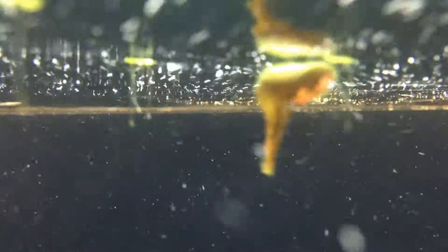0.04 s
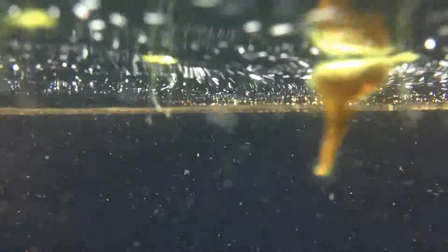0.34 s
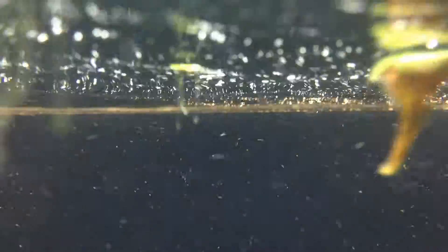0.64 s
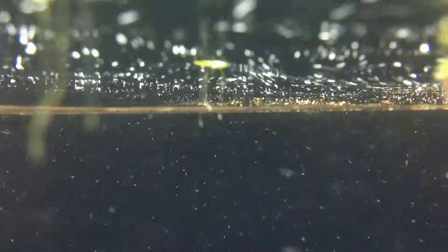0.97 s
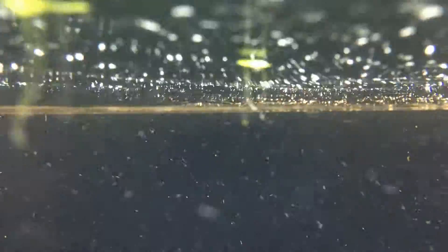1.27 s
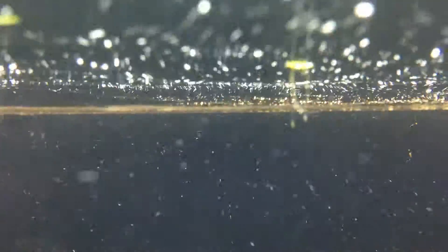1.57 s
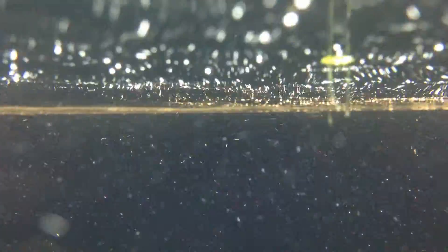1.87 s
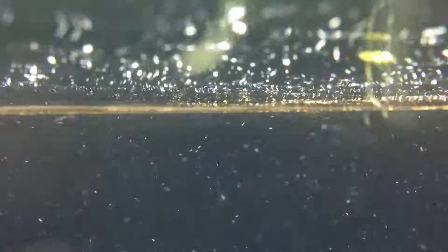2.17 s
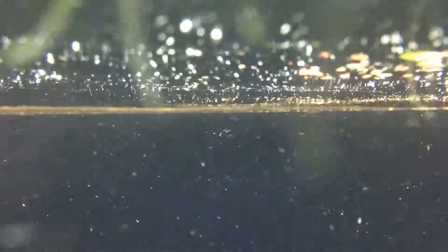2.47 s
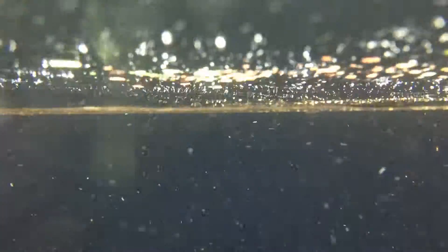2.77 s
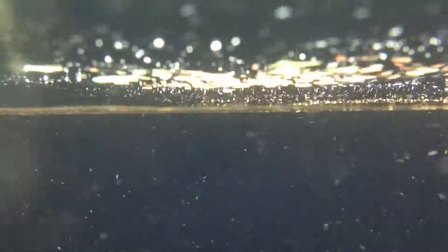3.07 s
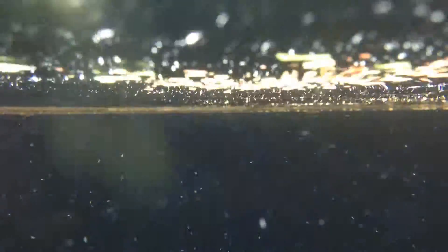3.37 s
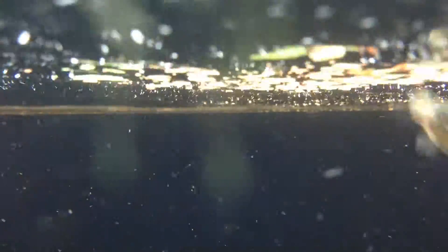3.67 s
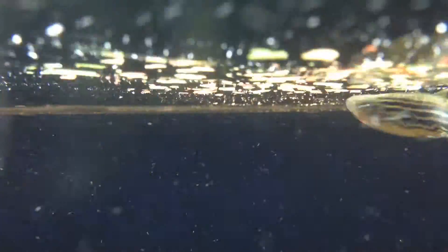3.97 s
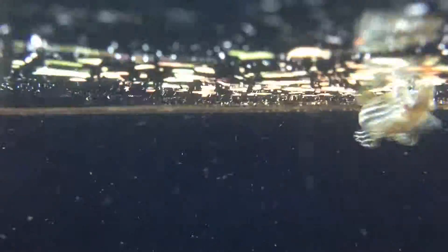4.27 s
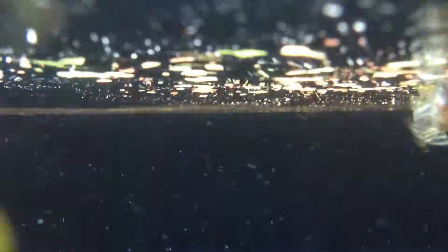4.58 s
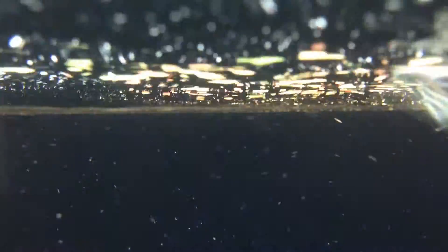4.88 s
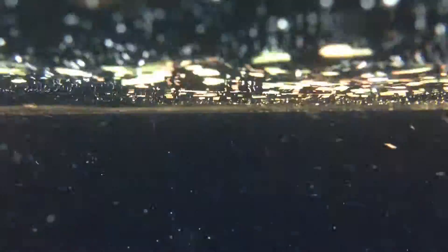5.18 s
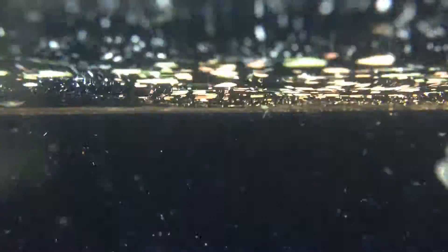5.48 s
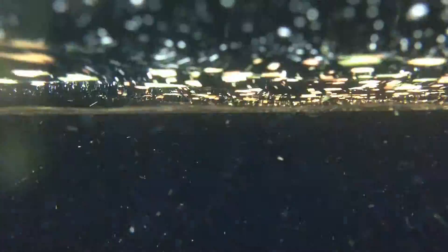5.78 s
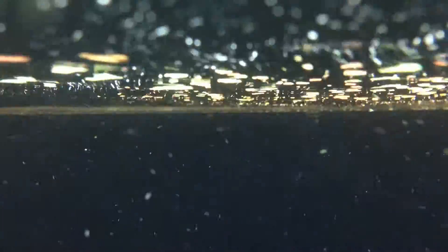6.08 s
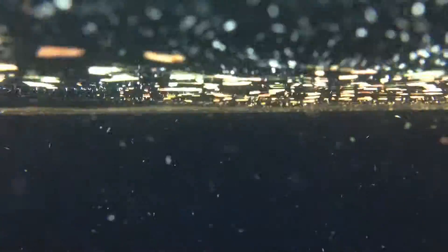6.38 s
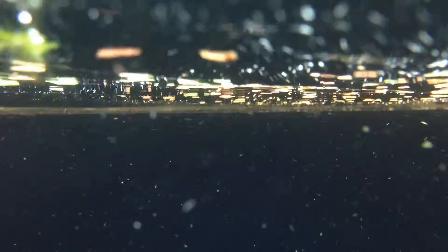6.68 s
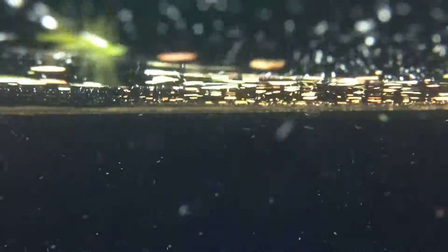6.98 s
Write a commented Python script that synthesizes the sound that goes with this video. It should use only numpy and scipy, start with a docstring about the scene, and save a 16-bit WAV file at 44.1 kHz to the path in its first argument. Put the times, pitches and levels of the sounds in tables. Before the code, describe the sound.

Aquarium water hisses and bubbles close by, interrupted by a sharp plastic snap and a few quick clicks from the feeding flap.

```python
"""Aquarium and feeding flap

Up close, the filter's outflow washes and fizzes, bubbles plip as they ring at the surface, and the
pump hums underneath. The plastic feeding flap bumps the hood, snaps open and clicks a few more times.
The snap ducks the recorder's gain control, and the water swells back over the next seconds."""
import sys
import numpy as np
from scipy import signal
from scipy.io import wavfile
from scipy.ndimage import uniform_filter1d

SR = 44100
rng = np.random.default_rng(int(sys.argv[2]) if len(sys.argv) > 2 else 0)


def materialize(psi):
    """Save the field psi as 16-bit PCM at rate SR to the path in sys.argv[1].

    A 1-D psi becomes a single channel; in a 2-D psi each row is a channel.
    """
    bounded = np.clip(np.atleast_2d(psi).T, -1, 1)
    quanta = np.round(bounded * 32767).astype(np.int16)
    wavfile.write(sys.argv[1], SR, quanta)


N = 319284
TIME = np.arange(N) / SR
BUBBLE_HZ = 1500   # reference pitch for bubble levels and swells


def plip(hz, swell_cycles):
    """One bubble swells and dies, its pitch rising as it nears the surface; equal energy at any pitch."""
    age = TIME[:int(10 * swell_cycles * SR / hz)] * hz / swell_cycles   # 1 at full swell
    envelope = age * np.exp(1 - age)
    cycles = age * swell_cycles * (1 + 0.004 * (age / 2 - 2))
    return envelope * np.sin(2 * np.pi * cycles) * np.sqrt(hz / swell_cycles / BUBBLE_HZ)


def large_bubbles(droplets, first_echo_s, t60_s):
    """Big plips where the outflow meets the surface, each with a small splash and its own reflections."""
    # Featured bubbles: start_s, pitch_hz, level_db, swell_cycles (1 plops, 3 pings), reflected_share
    bubbles = [(.05, 1810, -38, 3, 0.41), (.197, 910, -29, 0.76, 0.95), (0.21, 3770, -37.5, 1, 1),
               (0.4443, 1700, -32, 3.6, 0.19), (0.453, 2430, -41, 1.8, .7), (.565, 2300, -34.5, 5.2, 0.78),
               (.625, 1970, -32.5, 4, 0.61), (0.626, 3120, -32.5, 4, 0.68), (0.637, 1620, -38.5, 4.8, 0.38),
               (.772, 1540, -35, 1.3, .4), (1.104, 1720, -32.5, 6.2, 0.26), (1.122, 2630, -38, 4, 0.57),
               (1.24, 1950, -38, 4.2, 0.64), (1.264, 6200, -37.5, 4.5, 0.83), (1.365, 5400, -37.5, 3, 0.86),
               (1.407, 1020, -28, 4, 0.6), (1.45, 1780, -26.5, 1, 0.8), (1.62, 2550, -26, 3.2, 0.84),
               (1.628, 3400, -21.5, 0.56, 0.51), (1.641, 4700, -21.5, 0.57, .9), (1.646, 1660, -27, 3, .7),
               (1.649, 3800, -26, 1.7, 0.72), (1.7783, 1570, -19.5, 2, 0.65), (1.803, 1470, -26, 2.7, 0.29),
               (2.612, 622, -28, 2.4, 0.34), (2.613, 1555, -28.5, 2.2, 0.79),
               (2.705, 1976, -22.5, 2.9, 0.8), (2.706, 6800, -33, 2, 0.68), (2.71, 4900, -32, 3.3, 0.91),
               (2.728, 1510, -27.5, 1.5, 0.6), (2.741, 1010, -23.5, 2, 0.52), (3.04, 1910, -30.5, 3, 0.86),
               (3.085, 740, -31, 0.41, 0.78), (3.097, 1490, -31.5, 0.8, 0.9), (3.25, 1900, -28, 1.6, 0.97),
               (3.331, 1430, -32.5, 1.6, 0.73), (3.352, 1870, -30, 1.7, 0.81),
               (3.612, 5600, -35, 0.68, 0.96), (3.739, 2000, -28.5, 3.8, 0.7),
               (3.743, 2400, -30.5, 2.5, 0.57), (3.749, 2760, -35, 3, 0.5), (3.8, 5600, -34, 0.5, .9),
               (3.879, 3220, -30, 6.6, 0.36), (3.891, 3480, -36, 3.2, .85), (3.916, 3260, -36, 12, .7),
               (3.95, 5100, -42, 3, .8), (4.03, 5400, -41, 4, 0.88), (4.076, 3560, -38, 12, 0.49),
               (4.173, 2730, -37, 5.3, .7), (4.274, 3180, -36, 7, 0.44), (4.28, 1570, -36, 2.2, 0.62),
               (4.308, 4300, -37, 4, 0.98), (4.327, 5100, -34, 3, 0.87), (4.387, 1590, -33.5, 3.5, .7),
               (4.654, 1910, -27, 2.4, 0.59), (4.658, 2730, -36, 3, 0.52), (4.665, 1840, -30, 2.6, 0.26),
               (4.76, 4980, -39, 6, 0.86), (4.817, 1970, -30.5, 1.4, 0.86), (4.868, 2830, -37, 3, .5),
               (4.9, 6550, -38, 3, .6), (4.945, 2840, -40, 6.4, .5), (5.086, 2410, -29.5, 2.6, 0.74),
               (5.104, 2490, -31.5, 3.9, .6), (5.108, 6840, -32, 1, 0.73), (5.112, 3000, -38, 4, 0.44),
               (5.16, 2300, -34.5, 2, 0.8), (5.285, 6800, -35.5, 4, 0.66), (5.348, 4650, -36, 4, 0.94),
               (5.364, 4230, -40, 5.5, .7), (5.382, 1630, -26.5, 1.7, 0.88), (5.404, 1500, -35, 2, 0.6),
               (5.408, 2340, -34.5, 2.1, 0.86), (5.472, 1586, -31.5, 3.6, 0.62), (5.497, 1580, -35, 4, 0.4),
               (5.525, 5400, -34.5, 3.5, 0.9), (5.565, 5140, -36, 2.7, 0.91),
               (5.677, 3440, -37.5, 5.5, 0.75), (5.695, 3950, -38.5, 3.6, 0.78),
               (5.803, 2520, -39, 3.8, 0.74), (5.86, 2200, -40, 1, 0.79), (5.921, 2450, -39, 2, 0.8),
               (5.985, 3000, -45, 4.4, .6), (6.09, 3680, -41, 5, 0.65), (6.129, 1676, -29, 8.1, 0.35),
               (6.18, 1940, -36, 4.3, 1), (6.198, 2670, -35, 1.1, 0.92), (6.231, 3770, -41, 0.91, .9),
               (6.302, 2030, -35.5, 1.6, 0.65), (6.308, 5030, -41, 2, .8), (6.381, 1660, -35.5, 5.3, 0.5),
               (6.46, 4200, -36, 0.83, .8), (6.641, 1860, -37, 4.1, .65), (6.681, 2280, -36.5, 3, 0.37),
               (6.715, 1750, -33, 1.4, 0.92), (6.744, 5400, -40, 2, .8), (6.757, 1390, -36, 5, 0.71),
               (6.844, 1810, -28, 1.3, 0.78), (6.858, 1820, -33.5, 2.6, 0.3), (6.975, 4100, -40, 4, .8),
               (7.019, 6300, -33.5, 0.64, 0.74), (6.88, 5000, -40, 3, 0.92), (7.076, 2010, -37, 1.7, .8),
               (7.168, 5600, -38.5, 5, 0.8), (7.21, 5000, -41, 2, 0.87)]
    out, t = np.zeros(N), TIME[:SR // 5]
    for start_s, hz, db, swell_cycles, reflected in bubbles:
        note = np.zeros(len(t))
        add(note, 0, plip(hz, swell_cycles))
        lateness = rng.random(droplets)
        droplet_pitches = hz * 2 ** (0.24 * rng.standard_normal(droplets))
        for late, droplet_hz in zip(lateness, droplet_pitches):   # later droplets are softer
            add(note, 0.028 * late, from_db(-12 - 5 * late) * plip(droplet_hz, swell_cycles=1.3))
        walls = rng.standard_normal(len(t)) * (t > first_echo_s) * decay(t, t60_s)
        echoes = unit_energy(signal.fftconvolve(note, walls))
        add(out, start_s, from_db(db) * np.sqrt(1 - reflected) * note)
        add(out, start_s, from_db(db) * np.sqrt(reflected * np.sum(note ** 2)) * echoes)
    return out


def small_bubbles(flow_db, offset_db, spread_db, low_hz, high_hz, swell_cycles, count):
    """An unbroken patter of bubbles that rides the flow; the smallest ring for the most cycles."""
    out = np.zeros(N)
    for k, (when, pitch, size, length) in enumerate(rng.random((count, 4))):
        start = int((k + 2 * when) / count * N) % N
        hz = low_hz * (high_hz / low_hz) ** pitch
        db = flow_db[start] + offset_db + spread_db * size ** 2
        cycles = swell_cycles * (.5 + length) * np.sqrt(hz / BUBBLE_HZ)
        add(out, start / SR, from_db(db) * plip(hz, cycles))
    return room(out, echo_db=-6.5, tail_db=1.0, build_s=0.00058)


def flap(chatter_per_s, chatter_rise_s, chatter_decay_s, skid_s):
    """Sharp plastic contacts, each with its own pitch and a brief skid, set the loose flap chattering."""
    # Flap contacts: start_s, level_db, pitch_hz, crack_db, chatter_db (both relative to level_db)
    contacts = [(1.7397, -22, 5000, 0, 0), (1.758, -20, 10000, -6, -6), (1.875, -29, 6000, 6, -8),
                (1.8852, 1, 5650, -2, 13), (1.8846, 6, 1950, -35, -25), (1.8855, 1, 2900, -39, -20),
                (1.8896, -2, 9600, -8, -20), (1.921, 5, 1690, -21, -8), (2.0786, -9, 7500, -10, -10),
                (2.081, 4, 7100, -12, -5.5), (2.1072, 4, 4620, -23, -18), (2.108, 2.5, 1690, -31, -3.5),
                (2.2037, -8, 7000, -16, -6), (2.2058, -3.5, 6500, -14, -8), (2.213, 1, 5770, -21, -20),
                (2.2983, -0.5, 6850, -15.5, -9), (2.3498, -9, 7300, -14, -15)]
    # Resonances of the plastic: centre_hz, width_hz, gain_db
    flap_modes = [(1630, 19, 11), (1690, 50, 2), (1790, 82, 5.5), (2080, 230, -6), (3600, 60, 6),
                  (4370, 540, 3.5), (5050, 60, 4), (5600, 300, 1.5), (6100, 250, -0.5), (10100, 2700, 2.5),
                  (13100, 1200, 4)]
    knocks, rattles, t = np.zeros(N), np.zeros(N), TIME[:SR // 3]
    blow = signal.unit_impulse(len(t))
    for start_s, db, hz, crack_db, chatter_db in contacts:
        envelope = (1 - np.exp(-t / chatter_rise_s)) * np.exp(-t / chatter_decay_s)
        chatter = from_db(chatter_db) * unit_energy(crackle(len(t), chatter_per_s) * envelope)
        crack = .5 * blow + from_db(5) * noise_burst(t, skid_s)
        knock = from_db(crack_db) * crack + resonance(blow, hz, 0.28 * hz)
        rattle = from_db(crack_db) * chatter + resonance(chatter, hz, 0.45 * hz)
        add(knocks, start_s, from_db(db) * knock)
        add(rattles, start_s, from_db(db) * rattle)
    plastic = room(knocks, echo_db=-1.0, tail_db=-0.5, build_s=0.001) + rattles
    for hz, width_hz, gain_db in flap_modes:
        plastic = plastic + (from_db(gain_db) - 1) * resonance(plastic, hz, width_hz)
    crossover_hz = 1740   # the small flap radiates little below this; the hood carries some body
    snap = cut(plastic, crossover_hz, "high", order=5)
    body = from_db(-16.5) * cut(plastic, [350, crossover_hz], "band")
    return snap + body


def hood():
    """Soft bumps set the hood's low modes thudding."""
    # Dull bumps on the hood: start_s, level_db
    bumps = [(1.741, -34), (1.749, -34), (1.797, -48), (1.878, -47)]
    # Modes of the hood: pitch_hz, level_db, t60_s
    hood_modes = [(58, -7, 0.5), (80, -2, 0.13), (116, -6.5, 0.086), (161, 0, 0.078), (270, -3.5, 0.058),
                  (420, -4.5, 0.15), (690, -1, 0.024), (960, -6, 0.03)]
    pushes = np.zeros(N)
    for start_s, db in bumps:
        add(pushes, start_s, from_db([db]))
    return room(ring(pushes, hood_modes), echo_db=-8.5, tail_db=-4.5, build_s=0.0078)


def outflow_wash(level_db):
    """The outflow's low rush, with the hollow ring of the air it stirs under the hood."""
    # Tone of the wash: frequency_hz, density_db
    wash_spectrum = [(25, -20), (40, -11.5), (55, -4.5), (130, -8), (200, -5.5), (265, -9), (340, -5.5),
                     (440, -2.5), (670, 0), (850, -6.5), (1200, -8.5), (1700, -6.5), (2600, -26),
                     (5000, -22)]
    # Air resonances under the hood: pitch_hz, level_db, t60_s
    cavity_modes = [(268.5, -2.5, 0.14), (424, -1.5, 0.073), (473.4, -3, 0.14), (616, 7, 0.027),
                    (673.3, -1, 0.12), (742, -10.5, 0.18), (972.5, 3.5, 0.043)]
    hollow = from_db(-4.0) * unit_rms(ring(rng.standard_normal(N), cavity_modes))
    rush = coloured_noise(wash_spectrum, flicker_db=2.5, flicker_hz=12.0)
    return from_db(level_db) * (rush + hollow)


def outflow_hiss(fizz_db):
    """The outflow's bright, fizzing hiss, surging unevenly."""
    # Tone of the hiss: frequency_hz, density_db
    hiss_spectrum = [(900, -67), (1600, 1), (2500, 3), (4000, 0.5), (6000, -2.5), (9000, -2.5), (13000, 1),
                     (15500, 0)]
    level_db = fizz_db - 3.5 + 1.4 * drift(rate_hz=20.0)
    return from_db(level_db) * coloured_noise(hiss_spectrum, flicker_db=3.0, flicker_hz=10.8)


def spray(grains_per_s, low_hz):
    """Spurts of tiny bursting bubbles: dense bright crackle that rises quickly and fades."""
    # Spurts of fine spray: start_s, length_s, relative_level_db
    spurts = [(0.097, 0.12, -46.5), (0.467, 0.1, -45.5), (1.625, 0.075, -46.5), (3.618, 0.02, -49),
              (4.324, 0.051, -51.5), (4.708, 0.069, -48), (4.868, 0.066, -44), (5.11, 0.074, -50.5),
              (6.054, 0.036, -46), (6.298, 0.05, -44.5), (6.74, 0.033, -47), (7.02, 0.027, -56)]
    swell = np.zeros(N)
    for start_s, length_s, db in spurts:
        progress = np.linspace(0, 1, int(length_s * SR) + 2)
        add(swell, start_s, from_db(db) * np.sin(np.pi * progress ** 0.65))
    grains = unit_rms(cut(crackle(N, grains_per_s), low_hz, "high"))
    return from_db(4.5) * room(swell * grains, echo_db=-25.0, tail_db=-1.5, build_s=0.0039)


def froth(bubbles_per_s, hz, width_hz):
    """A crowd of like-sized tiny bubbles swells softly and fades."""
    # Clusters of froth: start_s, length_s, level_db
    clusters = [(0.768, 0.14, -45), (0.807, .05, -55), (0.875, 0.1, -48)]
    swell = np.zeros(N)
    for start_s, length_s, db in clusters:
        add(swell, start_s, from_db(db) * np.sqrt(np.hanning(int(length_s * SR) + 2)))
    pops = rng.choice([-1, 1], N) * (rng.random(N) < bubbles_per_s / SR)
    return swell * unit_rms(resonance(resonance(pops, hz, width_hz), hz, width_hz))


def pump(mains_hz, waver_db):
    """The motor hums on multiples of the mains rate, wavering slightly in level."""
    # Hum partials: mains_multiple, rms_db
    partials = [(2, -55.5), (3, -69.5)]
    hum = sum(np.sqrt(2) * from_db(db) * np.sin(2 * np.pi * (multiple * mains_hz * TIME + rng.random()))
              for multiple, db in partials)
    return hum * from_db(waver_db * drift(rate_hz=8.1))


def room(x, echo_db, tail_db, build_s):
    """Direct sound, a few early echoes smeared by the uneven hood, and a tail that dies band by band."""
    # Early echoes off glass and hood: delay_s, relative_level_db
    early_echoes = [(.0058, -5.5), (.0075, -11.5), (0.0138, -12.5), (0.018, -10)]
    # Decay of the room: frequency_hz, t60_s
    decay_times = [(200, 0.13), (1500, 0.29), (5000, 0.27), (15000, 0.27)]
    t, tail = TIME[:SR // 2], 0
    edges_hz = 60 * 2 ** (np.arange(18) / 2)
    for low, high in zip(edges_hz, edges_hz[1:]):
        band = cut(rng.standard_normal(len(t)), [low, high], "band")
        tail = tail + band * decay(t, at_hz(decay_times, np.sqrt(low * high)))
    response = from_db(tail_db) * unit_energy(tail * (1 - np.exp(-t / build_s)))
    response[0] += 1   # direct sound
    for delay_s, db in early_echoes:
        add(response, delay_s, from_db(db + echo_db) * noise_burst(t, decay_s=0.00093))
    return signal.fftconvolve(x, response)[:N]


def coloured_noise(spectrum, flicker_db, flicker_hz):
    """Third-octave bands of noise, each flickering on its own; rms 1."""
    edges_hz = 22 * 2 ** (np.arange(30) / 3)
    out, white = 0, rng.standard_normal((2, N))
    for k, (low, high) in enumerate(zip(edges_hz, edges_hz[1:])):
        gain = from_db(at_hz(spectrum, np.sqrt(low * high)) + flicker_db * drift(flicker_hz))
        out = out + gain * cut(white[k % 2], [low, high], "band")
    return unit_rms(out)


def crackle(samples, ticks_per_s):
    """Randomly timed ticks of random strength."""
    return rng.standard_normal(samples) * (rng.random(samples) < ticks_per_s / SR)


def noise_burst(t, decay_s):
    """A dying puff of noise; energy 1."""
    return unit_energy(rng.standard_normal(len(t)) * np.exp(-t / decay_s))


def drift(rate_hz):
    """A smooth random wander; rms 1."""
    step, settle = 40, 2000
    r = np.exp(-2 * np.pi * rate_hz * step / SR)
    noise = rng.standard_normal(N // step + settle + 2)
    slow = signal.lfilter([1], [1, -2 * r, r * r], noise)[settle:]
    return np.interp(np.arange(N) / step, np.arange(len(slow)), unit_rms(slow))


def ring(drive, modes):
    """Each push sets every mode ringing as a dying sine, neighbours in opposite polarity."""
    out = 0
    for k, (hz, db, t60_s) in enumerate(modes):
        r, w = decay(1 / SR, t60_s), 2 * np.pi * hz / SR
        mode = signal.lfilter([0, np.sin(w)], [1, -2 * r * np.cos(w), r * r], drive + 1e-18)
        out = out + (-1) ** k * from_db(db) * mode
    return out


def resonance(x, hz, width_hz):
    """One resonant band with gain 1 at its peak."""
    r, w = np.exp(-np.pi * width_hz / SR), 2 * np.pi * hz / SR
    return signal.lfilter(np.array([1, 0, -1]) * (1 - r * r) / 2, [1, -2 * r * np.cos(w), r * r], x + 1e-18)


def cut(x, hz, kind, order=2):
    sections = signal.butter(order, hz, kind, fs=SR, output="sos")
    return signal.sosfilt(sections, x + 1e-18)


def add(out, start_s, sound):
    start = int(np.clip(round(start_s * SR), 0, len(out) - 1))
    out[start:start + len(sound)] += sound[:len(out) - start]


def at_hz(points, hz):
    """Read a curve on a log-frequency axis."""
    frequencies, values = np.transpose(points)
    return np.interp(np.log(hz), np.log(frequencies), values)


def decay(t, t60_s):
    return np.exp(-np.log(1000) * t / t60_s)


def from_db(db):
    return 10 ** (np.asarray(db) / 20)


def unit_rms(x):
    return x / np.sqrt(np.mean(x ** 2) + 1e-20)


def unit_energy(x):
    return x / np.sqrt(np.sum(x ** 2) + 1e-20)


def scene():
    """Water, lid and pump, all close to one microphone."""
    # Level ride shared by the hiss and the finest bubbles: time_s, relative_level_db
    fizz_ride = [(0, -44), (.09, -48), (.22, -43.5), (.45, -46), (.66, -47.5), (.8, -43), (1.4, -47.5),
                 (2.4, -44.5), (3, -47), (4.4, -48), (4.8, -45), (5.2, -48), (5.6, -44.5), (5.9, -51),
                 (6.25, -46), (6.55, -50.5), (6.8, -47.5), (7.24, -47)]
    fizz_db = np.interp(TIME, *np.transpose(fizz_ride))
    wash_db = -51.98 + 4 * np.exp(-((TIME - 5.08) / 0.55) ** 2)   # the outflow wells up once
    water = outflow_wash(wash_db) + outflow_hiss(fizz_db)
    water += small_bubbles(wash_db, offset_db=-3.02, spread_db=8.0, low_hz=995, high_hz=5350,
                           swell_cycles=3.2, count=300)   # burble
    water += small_bubbles(fizz_db, offset_db=-11.5, spread_db=14.0, low_hz=4770, high_hz=13300,
                           swell_cycles=1.4, count=650)   # fizz
    water += large_bubbles(droplets=6, first_echo_s=0.0035, t60_s=0.2)
    water += froth(bubbles_per_s=6000, hz=3980, width_hz=1700)
    water += spray(grains_per_s=9000, low_hz=9400)
    lid = flap(chatter_per_s=14000, chatter_rise_s=0.013, chatter_decay_s=0.051, skid_s=0.00096) + hood()
    return (water + lid + pump(mains_hz=50, waver_db=0.25))[None]


def gain_control(x, threshold_db, slope, attack_s, release_s):
    """Sound over the threshold ducks the gain fast; it creeps back slowly."""
    power = uniform_filter1d(x ** 2, size=882, axis=-1, origin=440)   # the last 20 ms
    level_db = 10 * np.log10(np.abs(power) + 1e-12)
    wanted_db = slope * np.maximum(level_db - threshold_db, 0)
    release = np.exp(-TIME / release_s)
    held_db = np.maximum.accumulate(wanted_db / release, axis=-1) * release
    r = np.exp(-1 / (attack_s * SR))
    duck_db = signal.lfilter([1 - r], [1, -r], held_db)
    return x * from_db(-duck_db)


def record(dry):
    """The recorder's gain control, then a steep cut of the top end."""
    levelled = gain_control(dry, threshold_db=-31.0, slope=0.64, attack_s=0.014, release_s=1.0)
    cutoff_hz = 15330
    return signal.sosfilt(signal.ellip(12, .1, 80, cutoff_hz, fs=SR, output="sos"), levelled)


dry = scene()
out = record(dry)
materialize(out)
```